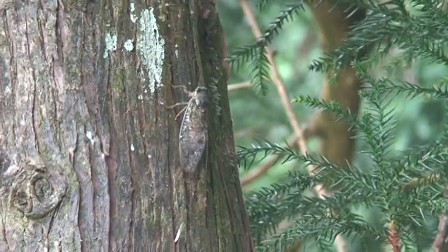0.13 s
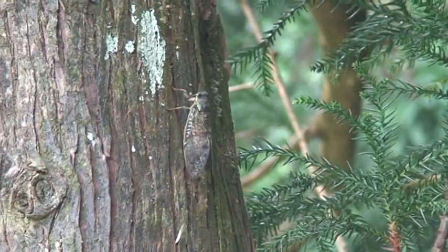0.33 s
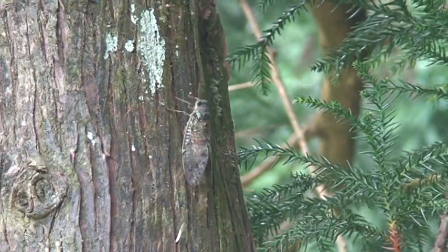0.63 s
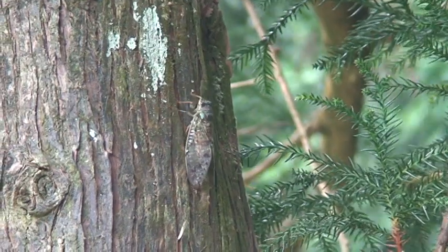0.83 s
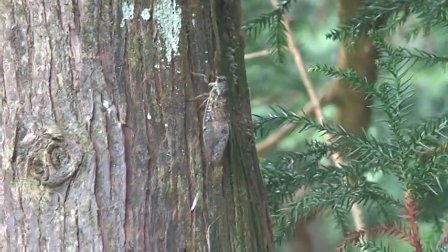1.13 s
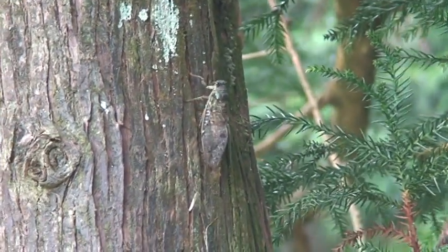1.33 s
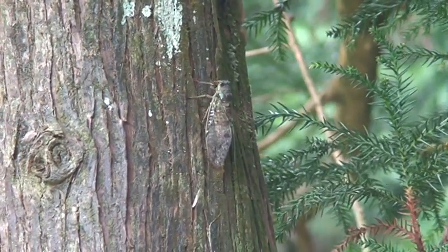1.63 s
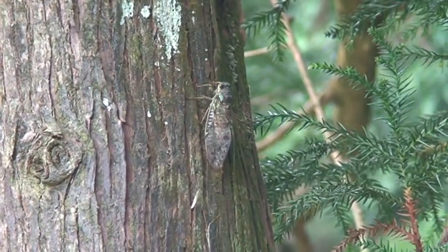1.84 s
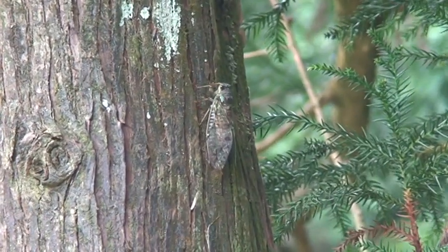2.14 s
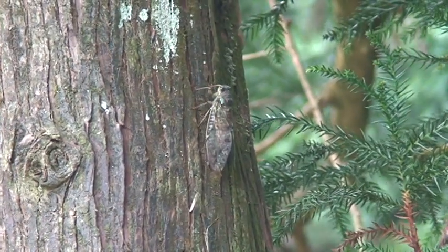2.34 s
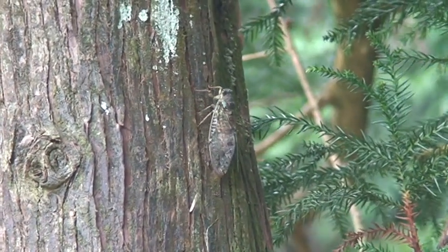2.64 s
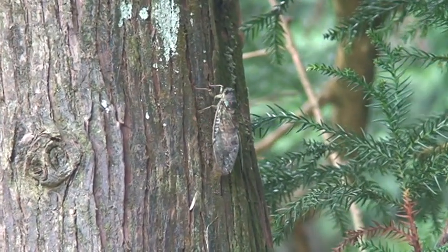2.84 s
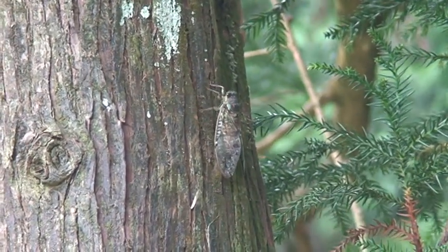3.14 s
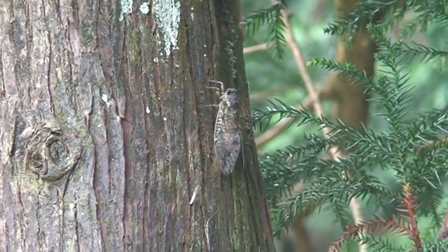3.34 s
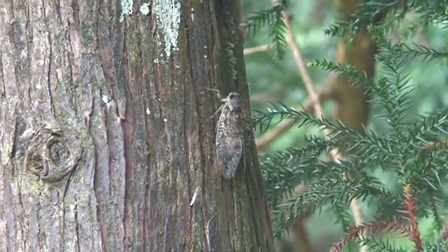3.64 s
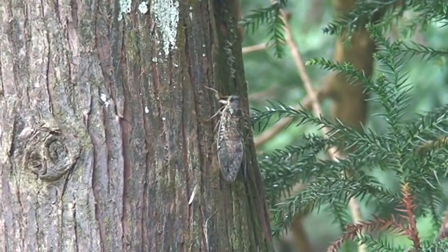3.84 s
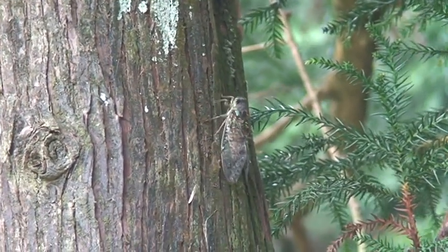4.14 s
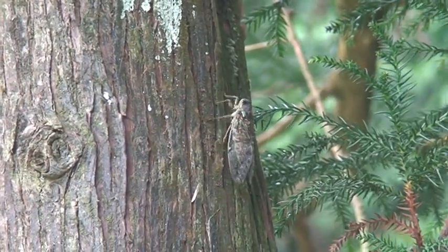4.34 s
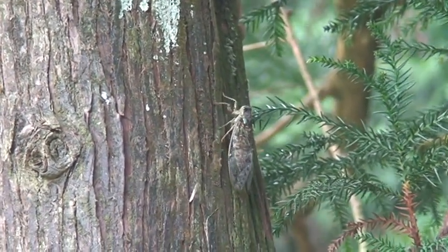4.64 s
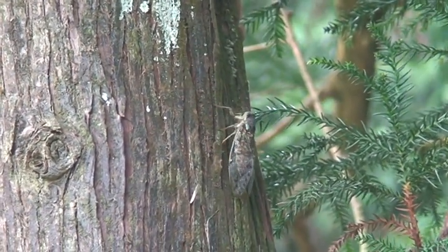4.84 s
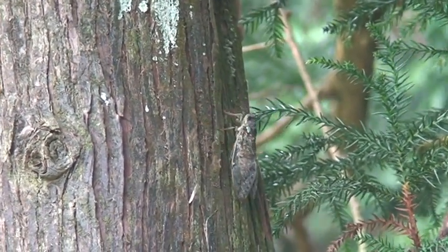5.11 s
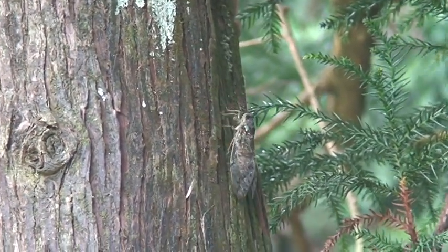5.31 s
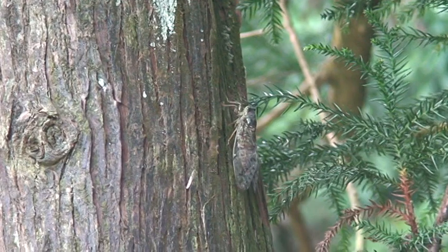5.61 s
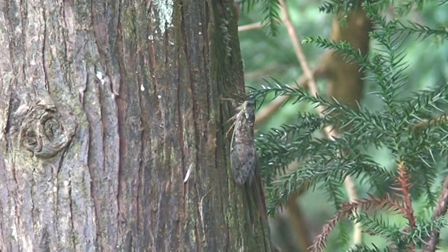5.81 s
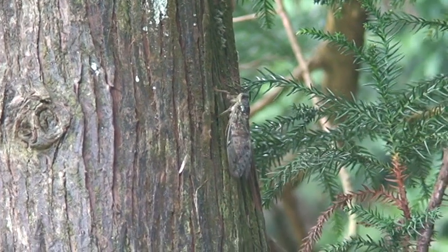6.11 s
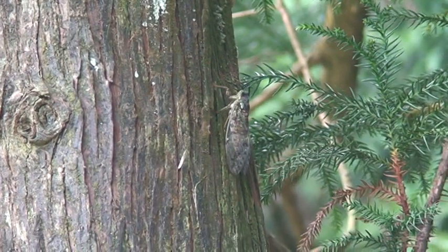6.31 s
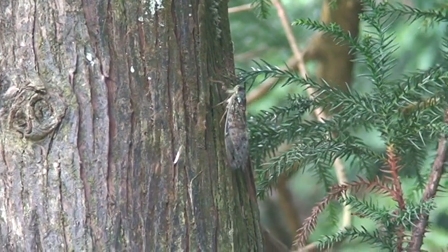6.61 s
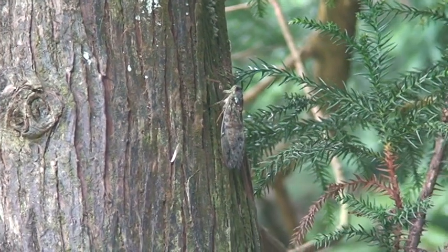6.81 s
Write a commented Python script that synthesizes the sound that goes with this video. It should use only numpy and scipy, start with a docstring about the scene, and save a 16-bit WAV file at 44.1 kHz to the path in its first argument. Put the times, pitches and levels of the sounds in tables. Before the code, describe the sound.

A cicada close by gives shrill chirps and a run of falling whines over a hissing insect chorus in woodland.

```python
"""Summer woodland, the microphone near a trunk where a cicada sings, slightly to the right: short shrill
chirps, then a run of falling whines between them, then chirps again. Its tymbal ribs buckle about 1900
times a second and ring the hollow abdomen, whose posture picks the loudest overtone. Farther off are a
croaking neighbour, two trills, thin whines, a hissing chorus, a very high pulsing insect and a motor.
Twigs tick faintly, and puffs of air brush the microphone."""
import sys
import numpy as np
from scipy import signal
from scipy.fft import rfft, irfft
from scipy.io import wavfile
from scipy.ndimage import uniform_filter1d

SR = 44100
rng = np.random.default_rng(int(sys.argv[2]) if len(sys.argv) > 2 else 0)


def wav_out(sig):
    """Save sig, one row per channel (or a flat mono array), as 16-bit PCM at SR to the path in sys.argv[1]."""
    wavfile.write(sys.argv[1], SR, np.round(np.clip(np.atleast_2d(sig).T, -1, 1) * 32767).astype(np.int16))


N = 306936
T = np.arange(N) / SR


def from_db(db):
    """Decibels to gain."""
    return 10 ** (np.asarray(db) / 20)


def rms_one(x):
    """Scale to unit power."""
    return x / np.sqrt(np.mean(x ** 2) + 1e-20)


def in_time(rows):
    """Each column of a curve at every sample."""
    times, *columns = np.transpose(rows)
    return [np.interp(T, times, column) for column in columns]


def at_hz(points, hz):
    """Read a spectrum on a log-frequency axis."""
    point_hz, point_db = np.transpose(points)
    return np.interp(np.log(hz + 1), np.log(point_hz), point_db)


def drift(rate_hz):
    """Random wandering of spread 1, mostly slower than rate_hz."""
    hz = np.fft.rfftfreq(N, 1 / SR)
    return rms_one(irfft(rfft(rng.standard_normal(N)) / (1 + (hz / rate_hz) ** 2), N))


def phase_of(hz):
    """Running phase of a changing frequency."""
    return 2 * np.pi * np.cumsum(hz) / SR


def syllable(start, length, attack, release):
    """Attack, hold and release, all in seconds."""
    return np.clip((T - start) / attack + .5, 0, 1) * np.clip((start + length - T) / release + .5, 0, 1)


def gate(start, length, edge):
    """A syllable with equally soft edges."""
    return syllable(start, length, edge, edge)


def resonate(x, body):
    """Parallel resonances (Hz, width in Hz, dB), each applied twice for steep skirts."""
    out = 0
    for hz, width_hz, db in body:
        r = np.exp(-np.pi * width_hz / SR)
        section = [(1 - r * r) / 2, 0, (r * r - 1) / 2, 1, -2 * r * np.cos(2 * np.pi * hz / SR), r * r]
        out = out + from_db(db) * signal.sosfilt([section, section], x + 1e-18)
    return out


# Stereo width at the microphone. Each row: frequency in Hz, side over mid in dB.
STEREO_WIDTH = [(30, -7), (110, -14.5), (380, -3.5), (700, -2), (1290, -6), (2380, -7.5), (4400, -14.5),
                (8120, -9.5), (15000, -19)]

def wide_noise(spectrum):
    """Stereo noise of a given colour, arriving from all around."""
    hz = np.fft.rfftfreq(N, 1 / SR)
    mid, side = rfft(rng.standard_normal((2, N))) * from_db(at_hz(spectrum, hz))
    side = side * from_db(at_hz(STEREO_WIDTH, hz))
    return rms_one(irfft(np.array([mid + side, mid - side]), N))


def trees(x, t60, wet_db):
    """Scatter from trunks and leaves: a short tail, a little different on each side."""
    t = T[:SR // 2]
    mid, side = rng.standard_normal((2, len(t))) * from_db(-60 * t / t60) * np.minimum(t / 0.037, 1)
    tails = np.array([mid + 0.7 * side, mid - 0.21 * side])
    tails = tails / np.sqrt(np.sum(tails ** 2) / 2)
    return x + from_db(wet_db) * signal.fftconvolve(x[None], tails, axes=1)[:, :N]


# The air of the wood, all around. Each row: frequency in Hz, relative density in dB.
AIR_SPECTRUM = [(100, 4.5), (250, 1.5), (600, -3), (1250, -6), (1750, 11), (2300, 3.5), (3300, 9.5),
                (4300, 2), (8000, 9), (9900, -11.5), (10600, -0.5), (13200, -31), (14300, -15), (18000, -9)]
# A hollow sound far off. Each row: resonance in Hz, width in Hz, relative gain in dB.
HOLLOW_RESONANCES = [(388, 22, -8), (638, 30, 8.5), (774, 71, 6)]
# It rises near the end. Each row: time in seconds, level in dB.
HOLLOW_LEVEL = [(0, -72), (6.55, -73), (6.7, -62.5), (6.96, -64)]

def woodland_air():
    """A steady wash of air with a faint hollow sound in it."""
    hollow_db, = in_time(HOLLOW_LEVEL)
    hollow = rms_one(resonate(wide_noise(AIR_SPECTRUM), HOLLOW_RESONANCES))
    air = signal.sosfilt(signal.butter(2, 55, "high", fs=SR, output="sos"), wide_noise(AIR_SPECTRUM))
    return from_db(-49.5) * air + from_db(hollow_db) * hollow


# A motor in the distance. Each row: time in seconds, level in dB.
MOTOR_LEVEL = [(3.3, -82), (4.1, -67.5), (5.3, -67.5), (5.5, -62), (5.65, -63), (6.6, -70.5), (6.84, -54.5),
               (6.96, -59)]

def motor():
    """A hum wavering around 111 Hz, with a weak octave."""
    hum_db, = in_time(MOTOR_LEVEL)
    turn = phase_of(111 * (1 + 0.0195 * drift(5.85)))
    return rms_one(np.cos(turn) + 0.18 * np.cos(2 * turn)) * from_db(hum_db + 2.2 * drift(10))


# Moving air at the microphone. Each row: frequency in Hz, relative density in dB.
RUMBLE_SPECTRUM = [(15, 0.5), (40, -4), (80, 1.5), (150, -9), (300, -29), (700, -44)]
# The strength of the breeze. Each row: time in seconds, relative level in dB.
BREEZE_LEVEL = [(.1, -66.5), (1.05, -75.5), (2.3, -64), (3.3, -81.5), (6.96, -83)]

def breeze():
    """A low uneven rumble, a little to the left, that dies down."""
    breeze_db, = in_time(BREEZE_LEVEL)
    level = from_db(breeze_db + 5 + 0.89 * drift(7))
    return level * wide_noise(RUMBLE_SPECTRUM) * from_db([[1.2], [-1.2]])


# Puffs right on the microphone. Each row: time in seconds, relative peak level in dB.
AIR_PUFFS = [(.19, -66), (.33, -61), (1.24, -55), (1.55, -55.5), (2.21, -61), (2.31, -53), (2.4, -53.5),
             (2.67, -57)]

def puffs(width_s=0.028):
    """Brief eddies, each side of the microphone with a rumble of its own."""
    level = sum(from_db(db) * np.exp(-((T - s) / width_s) ** 2) for s, db in AIR_PUFFS)
    left, right = wide_noise(RUMBLE_SPECTRUM)[0], wide_noise(RUMBLE_SPECTRUM)[1]
    return level * np.array([left + 0.27 * right, right + .4 * left]) * from_db([[3.8], [0.3]])


# An insect high above the chorus in pitch. Each row: frequency in Hz, relative density in dB.
INSECT_SPECTRUM = [(9000, -18), (12500, -16), (13300, -16), (14200, -12), (15200, -20), (16100, -1),
                   (17000, -9), (18200, -8.5)]

def high_insect(period_s=.245):
    """A very high hiss that pulses about four times a second."""
    beat = np.cos(2 * np.pi * (T - .087) / period_s)
    return wide_noise(INSECT_SPECTRUM) * from_db(-58.5 + 5.9 * beat + .6 * drift(25))


# The far chorus, a lower and a higher group. Each row: frequency in Hz, relative density in dB.
LOW_GROUP_SPECTRUM = [(4200, -33.5), (4800, -12.5), (5500, -3), (6400, 2.5), (7100, -0.5), (7600, -14),
                      (8300, -90), (9000, -67), (10000, -44)]
HIGH_GROUP_SPECTRUM = [(5800, -25.5), (6800, 4.5), (7400, 3.5), (8100, -9.5), (8600, -29), (9100, -23.5),
                       (9900, -29), (10600, -18), (11800, -23), (13200, -24), (14200, -32)]
# Their swells. Each row: time in seconds, relative levels of the lower and the higher group in dB.
GROUP_LEVELS = [(.3, -41, -44), (1.5, -40.5, -41), (2.1, -38.5, -40), (3.3, -39, -38.5), (4.05, -46, -38),
                (4.75, -44, -37), (5.4, -49, -38.5), (5.8, -42.5, -35), (6.35, -46, -36.5),
                (6.96, -44, -36.5)]
# The shrillest voices among them. Each row: time in seconds, level in dB.
SHRILL_LEVEL = [(0, -76), (3.55, -52), (3.9, -40.5), (4.7, -40.5), (5.9, -42), (6.3, -45.5), (6.96, -50)]

def chorus():
    """Many far cicadas merge into a hiss that still buzzes at their stroke rates."""
    low_db, high_db = in_time(GROUP_LEVELS)
    shrill_db, = in_time(SHRILL_LEVEL)
    low_buzz = 1 + sum(0.057 * np.cos(phase_of(hz * (1 + 0.012 * drift(11.3)))) for hz in (405, 487))
    high_buzz = 1 + 0.043 * np.cos(phase_of(284 * (1 + 0.02505 * drift(7.5))))
    low = wide_noise(LOW_GROUP_SPECTRUM) * from_db(low_db + 0.91 * drift(7.3))
    high = wide_noise(HIGH_GROUP_SPECTRUM) * from_db(high_db - 3 + 0.54 * drift(22))
    shrill = rms_one(resonate(wide_noise(HIGH_GROUP_SPECTRUM), [(8520, 880, 0)])) * from_db(shrill_db)
    return low * low_buzz + (high + shrill) * high_buzz


# Two trilling cicadas, far back in the trees. Each row: overtone in Hz, relative level in dB.
FIRST_OVERTONES = [(2385, -61), (2600, -67), (2756, -64), (2907, -60.5), (5040, -57.5)]
SECOND_OVERTONES = [(1515, -63.5), (2285, -59.5), (2552, -59), (2800, -57.5), (4517, -79), (4753, -69),
                    (4974, -92)]
# Their bouts. Each row: start in seconds, length in seconds, notes per second, gain in dB.
FIRST_TRILL_BOUTS = [(0.603, 1.25, 7.05, 5), (2.28, 1.92, 6.6, 6.5)]
SECOND_TRILL_BOUTS = [(1.1, 2.2, 7, 0.43), (3.998, 1.25, 6.5, 4.5), (5.83, 1.3, 7.2, 4.6)]

def far_trill(overtones, bouts, sag, blur, dip, edge_s=0.253):
    """A distant cicada: bouts of slightly falling notes, blurred by the trees."""
    level, note_progress = np.zeros(N), np.zeros(N)
    for start, length, notes_per_s, db in bouts:
        level += from_db(db) * gate(start, length, edge_s)
        note_progress = np.where(T > start - edge_s, ((T - start) * notes_per_s) % 1, note_progress)
    phase_per_hz = phase_of(1 - sag * (note_progress - .5) + .005 * drift(1.512))
    tone = sum(np.cos(hz * phase_per_hz + blur * drift(30)) * from_db(db + 2 * drift(22))
               for hz, db in overtones)
    return tone * level * (1 - dip * np.cos(np.pi * note_progress) ** 2)


# Thin whines of farther singers. Each row: start and length in seconds, first and last pitch in Hz,
# level in dB.
DISTANT_WHINES = [(0.06, 0.4, 3360, 3350, -56), (1.151, 0.68, 6350, 6380, -46.5),
                  (1.68, 0.24, 3770, 3800, -49), (4.795, 0.21, 3610, 3490, -43),
                  (5.122, 0.27, 3570, 3514, -47), (5.476, 0.25, 3490, 3525, -50.5),
                  (5.658, 0.215, 3660, 3684, -46.5), (5.831, 0.16, 3500, 3460, -45),
                  (5.999, 1, 7460, 7367, -39.5)]

def far_whines():
    """Distance leaves only the strongest overtone of each whine."""
    out = np.zeros(N)
    for start, length, first_hz, last_hz, db in DISTANT_WHINES:
        hz = np.interp(T, [start, start + length], [first_hz, last_hz])
        out += from_db(db) * gate(start, length, edge=0.093) * np.cos(phase_of(hz) + 0.18 * drift(60))
    return out * from_db(1.6 * drift(30))


# Faint ticks in the foliage. Each row: start in seconds, relative level in dB, pitch in Hz.
TWIG_TICKS = [(0.258, -46.5, 680), (3.88, -52, 1213), (4.668, -51, 1200), (4.712, -49, 1354),
              (4.93, -50, 1398), (5.779, -51, 1148), (6.42, -54, 1171), (6.499, -53, 1010)]

def ticks():
    """Small damped taps among the twigs, each with a thin bright crack."""
    out = np.zeros(N)
    for start, db, hz in TWIG_TICKS:
        age = np.maximum(T - start, 0)
        crack = rng.standard_normal(N) * np.exp(-age / 0.007)
        tap = rms_one(resonate(rng.standard_normal(N), [(hz, 450, 0)])) * np.exp(-age / 0.0046)
        out += from_db(db) * (tap + 0.5 * crack) * (T >= start)
    return out


def tymbal(rib_hz, rough, jitter, throb, swing, uneven, ribs_per_stroke=6.9):
    """Buckling ribs: pulses whose strength (throb) and pace (swing) vary over each muscle stroke."""
    phase = phase_of(rib_hz * (1 + jitter * drift(99.1)))
    stroke = phase / ribs_per_stroke + .5 * drift(27)
    phase = phase + swing * (np.sin(stroke) + uneven * np.sin(stroke / 2))
    ribs = rms_one(sum(np.cos(k * phase + k * k) for k in range(1, 8)))
    swell = 1 + throb * (np.cos(stroke) + uneven * np.cos(stroke / 2))   # left and right tymbal differ
    rough = np.clip(rough, 0, 1)   # irregular buckling turns the tone to rasp
    return swell * ((1 - rough) * ribs + 2.15 * rough * rng.standard_normal(N))


# A neighbouring cicada. Each row: start in seconds, relative level in dB.
NEIGHBOUR_CROAKS = [(0.289, -42), (0.854, -42), (1.443, -42.5), (2.624, -42), (3.176, -54), (4.069, -43),
                    (4.800, -45.5), (5.412, -42), (5.935, -43), (6.505, -44.5)]
# Its abdomen. Each row: resonance in Hz, width in Hz, relative gain in dB.
CROAK_RESONANCES = [(1822, 223, -1.5), (3380, 500, -12), (5050, 700, -15)]

def croaks():
    """A neighbour's low syllables, each a handful of coarse pulses."""
    level = sum(from_db(db) * gate(start, 0.042, edge=0.005) for start, db in NEIGHBOUR_CROAKS)
    pulses = 1 + 0.71 * np.cos(phase_of(172 * (1 + 0.0566 * drift(36))))
    source = pulses * tymbal(1790, rough=0.64, jitter=0.0135, throb=0.12, swing=.1, uneven=.5)
    return level * rms_one(resonate(source, CROAK_RESONANCES))


# The near cicada's chirps. Each row: start and length in seconds, rib rate in Hz, relative level in dB.
NEAR_CHIRPS = [(.109, 0.035, 1927, -35), (0.561, 0.037, 1920, -36), (1.02, .043, 1917, -36.5),
               (1.524, 0.038, 1921, -40.5), (2.075, .08, 1973, -31), (2.421, 0.041, 1976, -29),
               (2.725, 0.039, 1971, -30), (3.025, .042, 1961, -30), (3.324, 0.039, 1949, -28.5),
               (3.636, .052, 1934, -29.5), (3.965, 0.05, 1937, -27), (4.329, 0.049, 1934, -25.5),
               (4.821, 0.0473, 1920, -26.5), (5.127, 0.05, 1919, -27.5), (5.484, 0.045, 1915, -27),
               (5.878, .037, 1911, -26.5), (6.247, 0.0364, 1907, -27), (6.628, 0.045, 1921, -30)]
# Its abdomen while chirping, in four bands. Each row: resonance in Hz, width in Hz, relative gain in dB.
LOW_BAND = [(1833, 520, 0.5), (3960, 1070, 1)]
MIDDLE_BAND = [(5580, 1400, 0)]
MAIN_BAND = [(7620, 370, 0.5)]
TOP_BAND = [(9370, 140, 5), (9630, 380, 2), (11330, 480, -8.5), (13600, 410, -28)]

def chirps(easy_rib_hz=1905, hard_rib_hz=1970, attack_s=.014, release_s=.0064, lead_in_s=.012):
    """Short shrill syllables; the rib rate scoops up, arches and falls back in each."""
    start, length = np.transpose(NEAR_CHIRPS)[:2]
    centre = start + length / 2
    nearest = np.searchsorted((centre[1:] + centre[:-1]) / 2, T)
    start, length, rib_hz, db = np.array(NEAR_CHIRPS)[nearest].T
    strain = (rib_hz - easy_rib_hz) / (hard_rib_hz - easy_rib_hz)   # faster ribs: shriller and cleaner
    arch = np.minimum(((T - centre[nearest]) / length - .1) ** 2, 1)
    scoop = .045 * np.exp(-np.maximum(T - start + lead_in_s, 0) / .005)
    source = tymbal(rib_hz * (1 - .007 * arch - scoop), rough=0.34 - 0.23 * strain,
                    jitter=0.001646, throb=0.31, swing=-0.065, uneven=0.32)
    low_db = 0.5 * db - 26.5   # the lowest overtones grow less with effort
    middle_db = db + np.interp(T, [1.3, 2.6], [-8, -9])
    top_db = db - 17.5 + 11.5 * strain
    voice = 0
    for band, band_db in (LOW_BAND, low_db), (MIDDLE_BAND, middle_db), (MAIN_BAND, db), (TOP_BAND, top_db):
        ring = resonate(source, band)
        running_rms = np.sqrt(uniform_filter1d(ring ** 2, size=1500) + 1e-12)
        voice = voice + ring / running_rms * from_db(band_db)
    swell = np.interp(T, [1.9, 2.07, 2.12], [1, .4, 1])   # the long chirp before the whines builds up
    weak_first_strokes = from_db(-9.5) * syllable(start - lead_in_s, length, attack_s, release_s)
    return voice * np.maximum(weak_first_strokes, syllable(start, length, attack_s, release_s)) * swell


# The near cicada's whines. Each row: start and length in seconds, first rib rate in Hz,
# relative level in dB.
NEAR_WHINES = [(2.126, .24, 1970, -24), (2.507, 0.15, 1966, -24), (2.827, 0.16, 1958, -23),
               (3.125, 0.17, 1953, -24), (3.421, 0.15, 1948, -24), (3.749, 0.1664, 1938, -24),
               (4.078, .21, 1936, -25), (4.448, .2, 1925, -26)]

def whine_controls(effort_db, sag_hz=38.5, fade_db_per_s=12.5, catch_db=-4):
    """Rib rate and tone level: each whine leaps out of the idling tone, sags, catches and drops back."""
    chirp_s, _, chirp_hz, _ = np.transpose(NEAR_CHIRPS)
    rib_hz, tone_db = np.interp(T, chirp_s, chirp_hz), effort_db
    for start, length, first_hz, db in NEAR_WHINES:
        age = T - start
        singing = syllable(start, length, attack=0.023, release=0.022)
        catch = np.exp(-((age - length + 0.085) / 0.011) ** 2)   # a brief dip before the last push
        rib_hz = rib_hz + singing * (first_hz - sag_hz * age / length - rib_hz)
        tone_db = tone_db + singing * (db - fade_db_per_s * age + catch_db * catch - tone_db)
    return rib_hz, tone_db


# The near cicada's effort. Each row: time in seconds, relative level of rattle and idling tone in dB.
SONG_EFFORT = [(1.6, -76), (1.8, -49), (2.0, -39), (2.12, -32), (3.0, -32.5), (4.58, -35), (4.72, -39),
               (5.7, -45), (6.1, -49.5), (6.96, -54)]
# Its abdomen in whine and rattle posture. Each row: resonance in Hz, width in Hz, relative gain in dB.
WHINE_RESONANCES = [(1898, 125, -18), (3869, 410, 3), (5510, 840, -14.5), (7717, 660, -14.5),
                    (9910, 390, -22.5), (11550, 880, -30)]
RATTLE_RESONANCES = [(1962.5, 226, -2.5), (3840, 190, -1.5), (5470, 270, -12.5), (7760, 500, -7.5),
                     (10150, 220, -22), (11600, 420, -36)]

def whine(pause_db=-10.5):
    """The long tone and its dry rattle; the rattle slackens just before each chirp."""
    effort_db, = in_time(SONG_EFFORT)
    rib_hz, tone_db = whine_controls(effort_db)
    rough = np.interp(tone_db, [-36, -25], [.6, .18])   # the harder it sings, the purer the tone
    tone_ribs = tymbal(rib_hz, rough, jitter=0.002464, throb=0.92, swing=0.15, uneven=0.31)
    rattle_ribs = tymbal(rib_hz, rough=0.85, jitter=0.01143, throb=1.0, swing=0.083, uneven=0.18)
    tone = rms_one(resonate(tone_ribs, WHINE_RESONANCES))
    rattle = rms_one(resonate(rattle_ribs, RATTLE_RESONANCES))
    pause = sum(gate(start - 0.042, 0.031, edge=0.018) for start, *_ in NEAR_CHIRPS)
    tone_level = from_db(tone_db - 4.5 + 1.42 * drift(42)) * gate(1.63, 5.2, edge=.1)
    rattle_level = from_db(effort_db - 6 + pause_db * pause + 1.85 * drift(28.2))
    return tone * tone_level + rattle * rattle_level


# The insects sit to the right of the microphone. Each row: time in seconds, left over right gain in dB.
INSECT_BALANCE = [(0, -2.5), (3.0, -2), (4.7, -1.5), (5.3, -1.1), (6.96, -1.9)]

def scene():
    """The near singer among its neighbours, over the air of the wood."""
    far = far_trill(FIRST_OVERTONES, FIRST_TRILL_BOUTS, sag=0.008, blur=0.16, dip=0.91)
    far += far_trill(SECOND_OVERTONES, SECOND_TRILL_BOUTS, sag=0.019, blur=0.39, dip=0.56)
    far += far_whines()
    short_sounds = trees(chirps() + croaks() + ticks(), t60=0.29, wet_db=-8.5) * from_db([[-.5], [.5]])
    whining = trees(whine(), t60=0.14, wet_db=-4.5) * from_db([[-.2], [.2]])
    balance_db, = in_time(INSECT_BALANCE)
    pan = from_db([balance_db / 2, -balance_db / 2])
    insects = (short_sounds + whining + far + chorus() + high_insect()) * pan
    return insects + motor() + woodland_air() + breeze() + puffs()


def record(dry):
    """The sound fades in after a brief silence; the top is cut steeply at 18150 Hz."""
    fade_in = np.clip((T - .062) / .02, 0, 1)
    return signal.sosfilt(signal.ellip(14, .1, 80, 18150, fs=SR, output="sos"), dry * fade_in)


dry = scene()
out = record(dry)
wav_out(out)
```